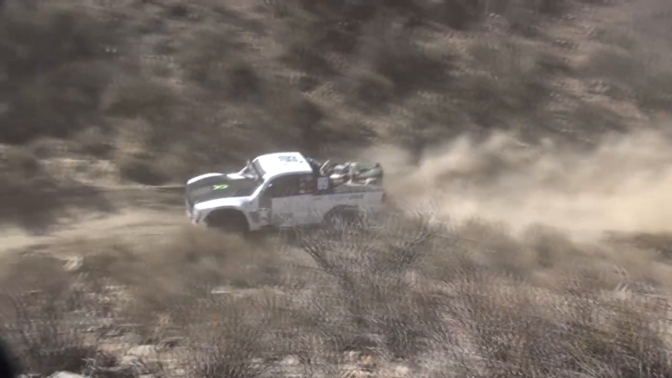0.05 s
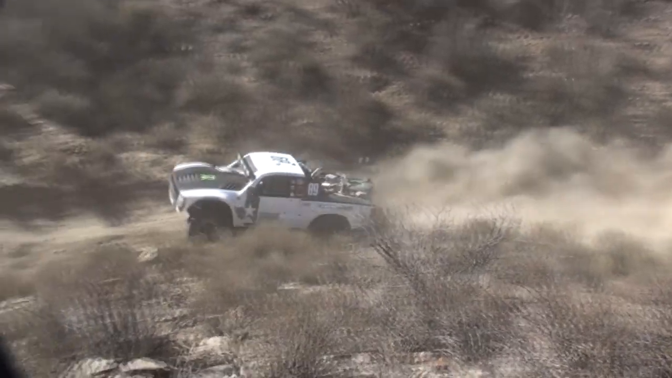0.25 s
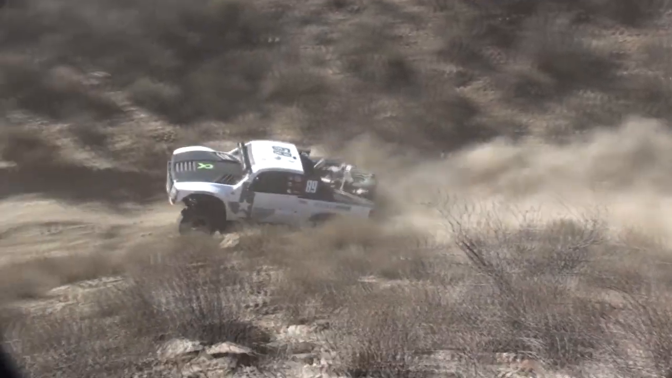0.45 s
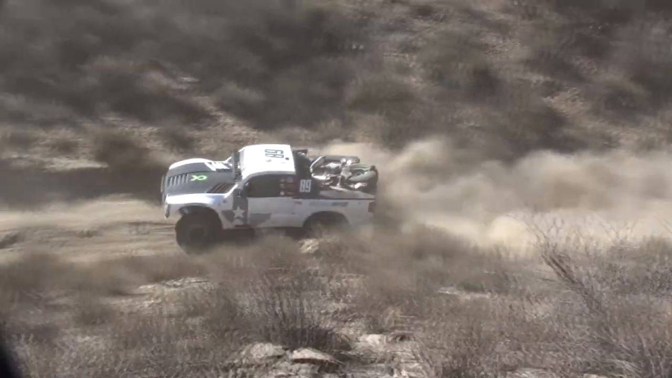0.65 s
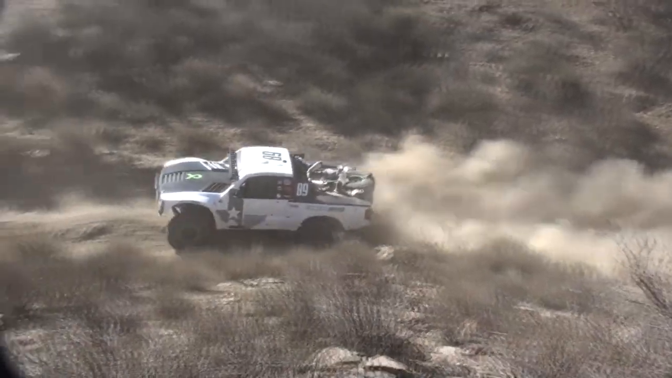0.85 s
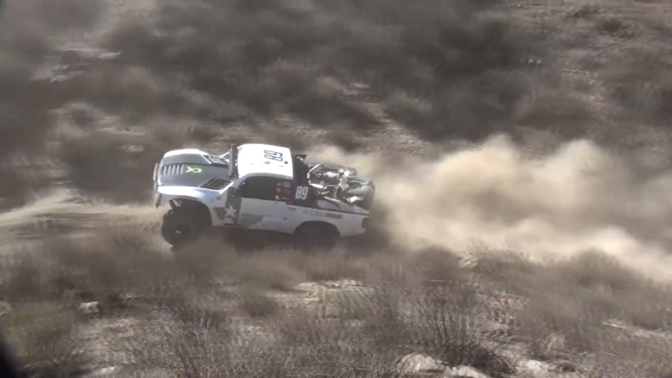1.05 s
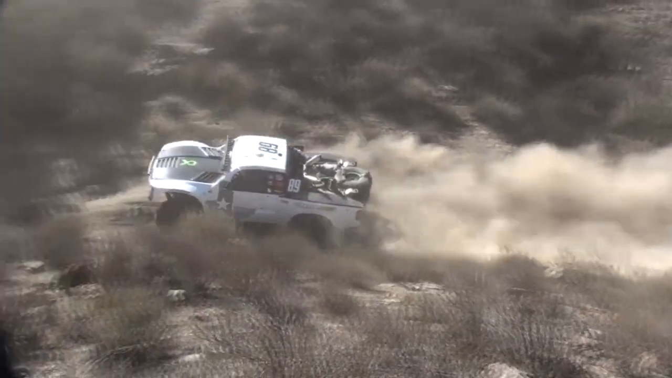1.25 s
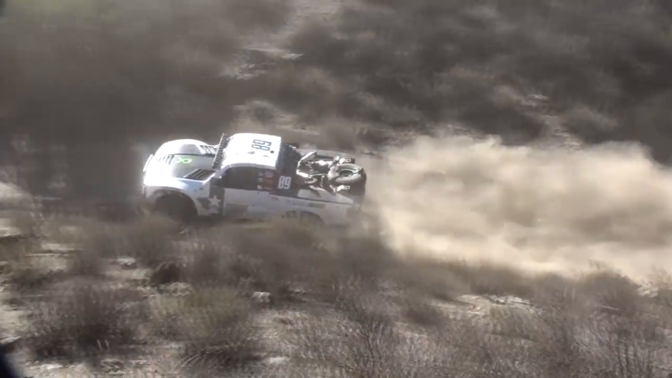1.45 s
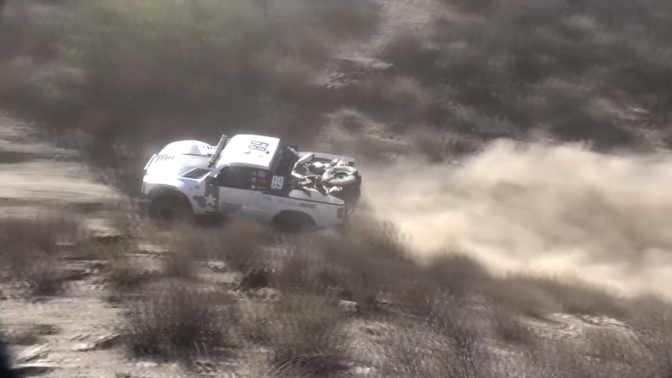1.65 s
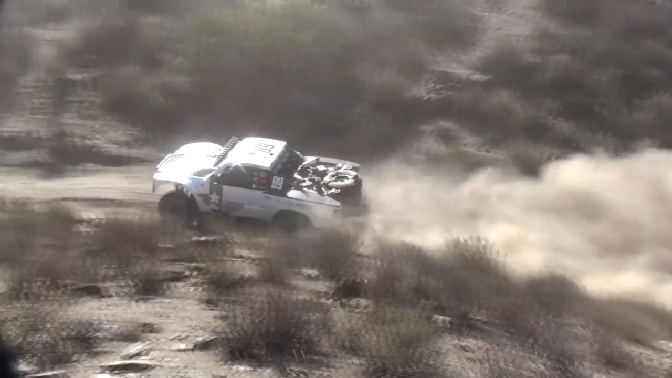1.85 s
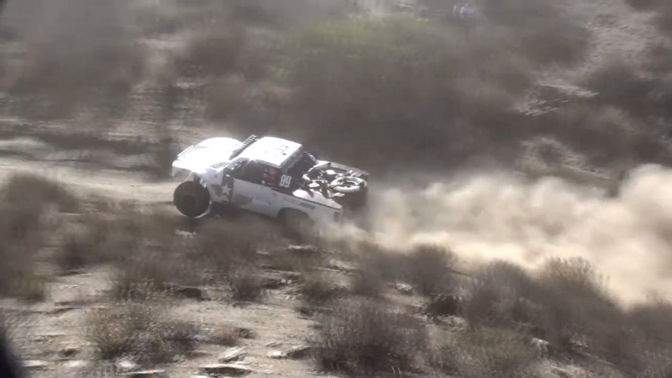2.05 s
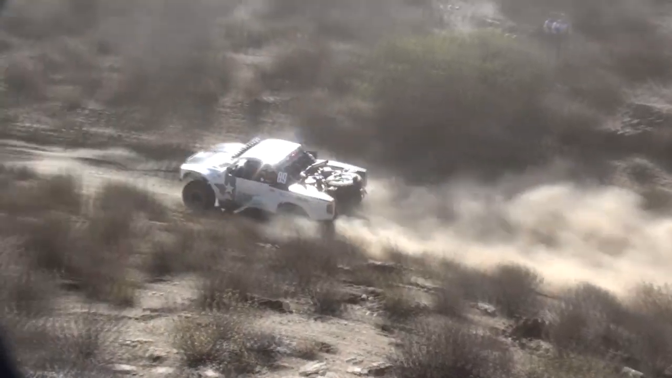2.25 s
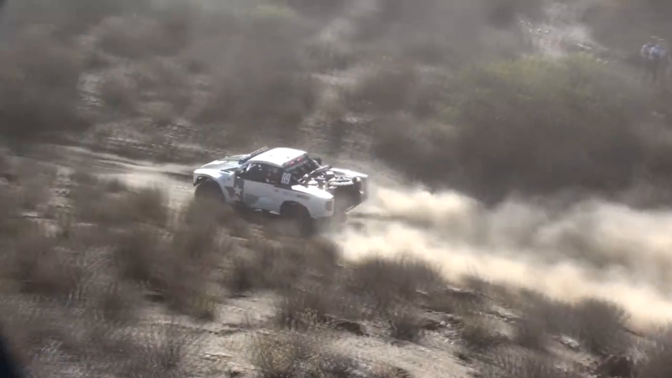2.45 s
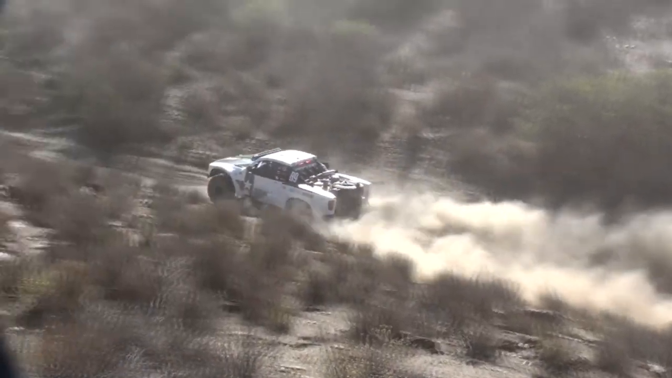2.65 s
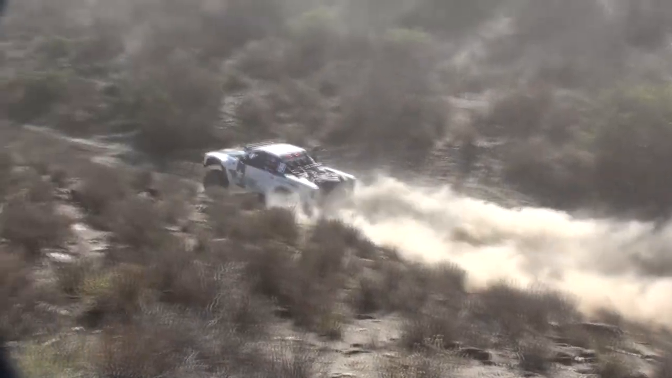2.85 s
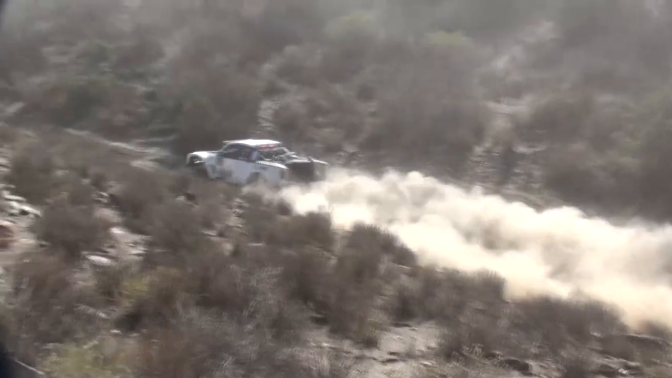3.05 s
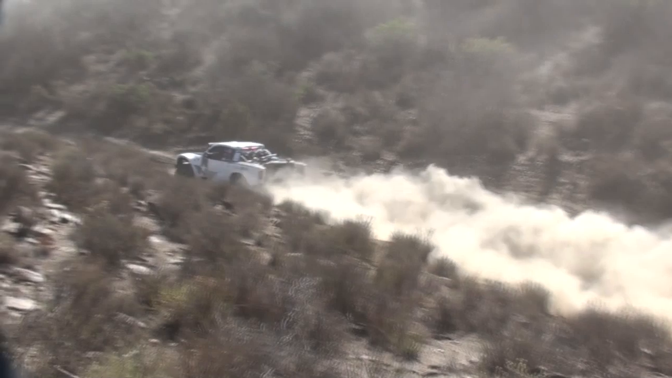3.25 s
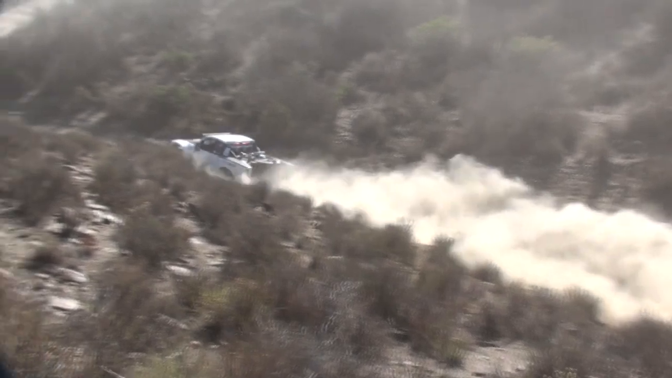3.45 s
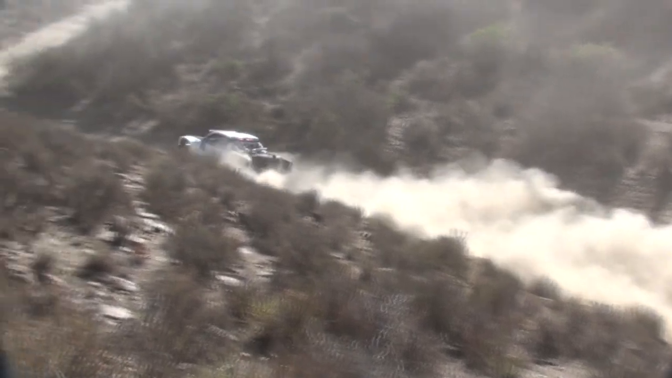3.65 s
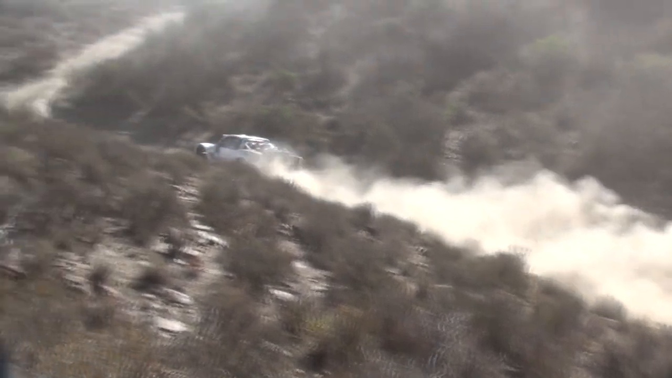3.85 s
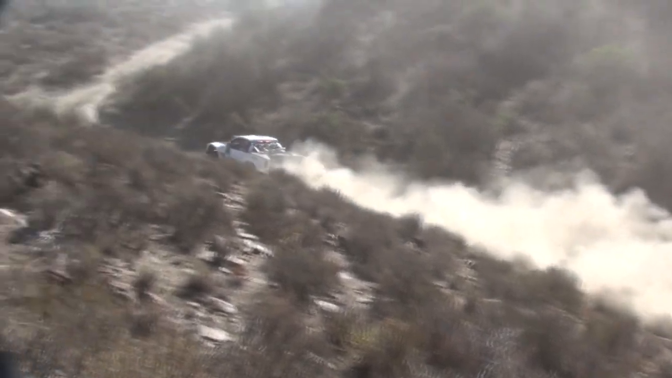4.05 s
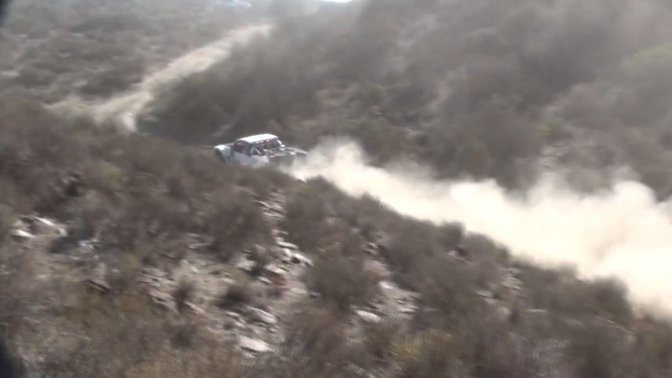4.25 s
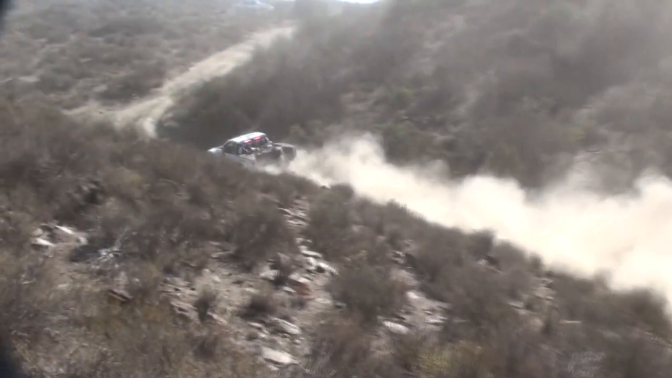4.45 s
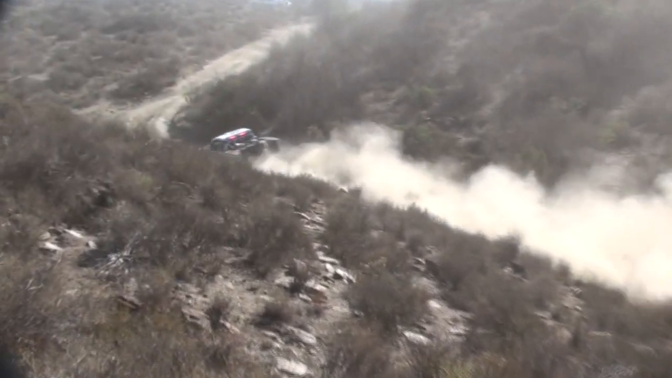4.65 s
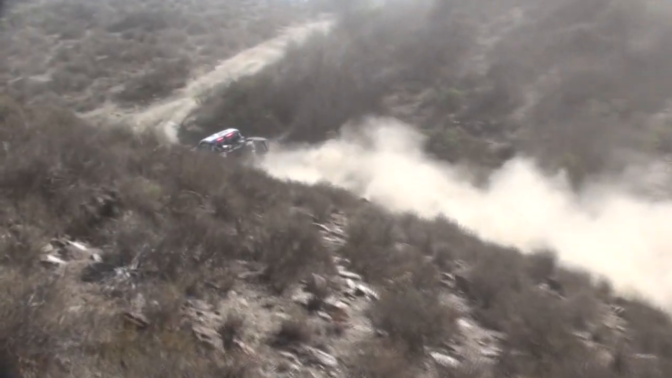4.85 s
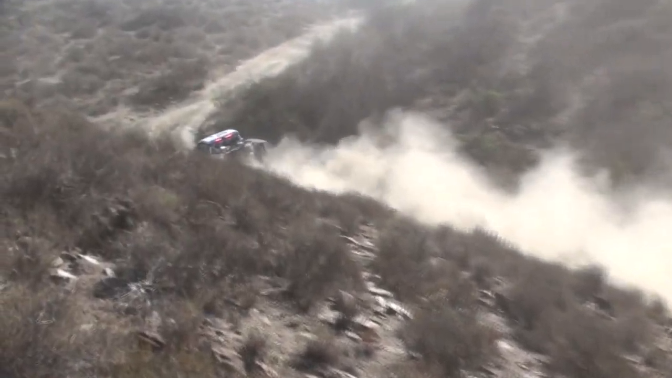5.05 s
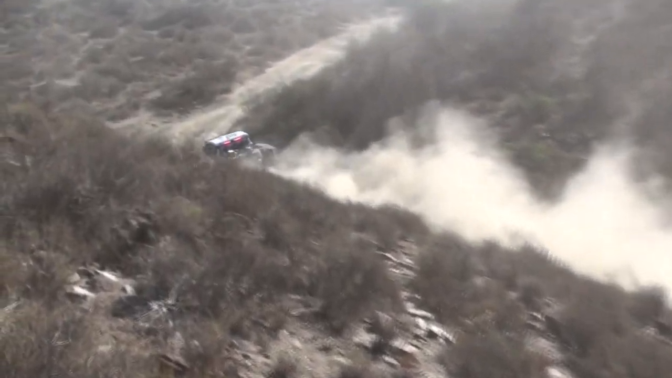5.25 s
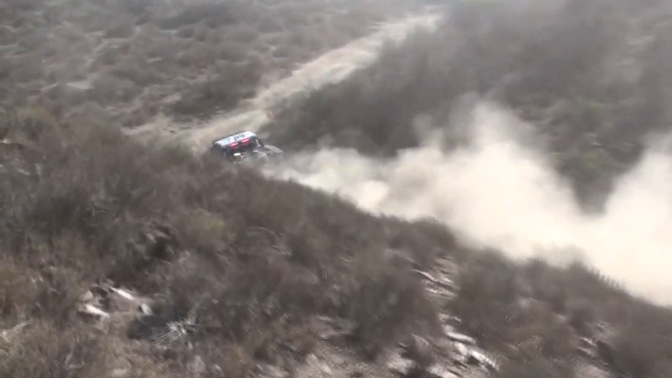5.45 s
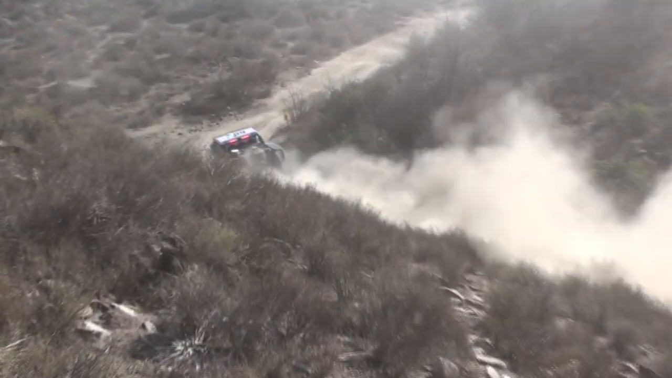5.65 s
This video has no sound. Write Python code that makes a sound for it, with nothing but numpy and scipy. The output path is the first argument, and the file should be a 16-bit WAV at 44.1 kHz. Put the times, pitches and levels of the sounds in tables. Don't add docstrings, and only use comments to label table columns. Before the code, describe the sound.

A racing truck's raw eight-cylinder exhaust rasps and crackles up a dusty hillside, then drops away to a faint coasting burble with brake squeal.

```python
import sys
import numpy as np
from scipy import signal
from scipy.fft import rfft, irfft, next_fast_len
from scipy.io import wavfile
from scipy.ndimage import uniform_filter1d, map_coordinates

SR = 44100
rng = np.random.default_rng(int(sys.argv[2]) if len(sys.argv) > 2 else 0)


def gain_from_db(level_db):
    decades = np.asarray(level_db, float) / 20
    return 10 ** decades


def materialize(psi):
    bounded = np.clip(np.atleast_2d(psi).T, -1, 1)
    quanta = np.round(bounded * 32767).astype(np.int16)
    wavfile.write(sys.argv[1], SR, quanta)


N = 251811

# (time [s], drop of the drone [dB], drop of the rasp [dB])
THROTTLE_LIFTS = [(.36, -2, 0.5), (.51, 2, -0.5), (2.41, 0, 7), (2.66, 3.5, 2), (3.2, 5, 1), (3.94, 7, 3),
                  (4.72, 14, 2), (4.88, 8.5, 2), (5.07, 5.5, 2.5), (5.4, 5.5, 0.5), (5.57, -3.5, -1.5),
                  (5.7, 3, -1.5)]
LIFT_S = 0.1


def engine():
    # (time [s], crank speed [turns/s])
    crank_speed = [(0, 43), (.27, 43.5), (.33, 48), (.47, 51.5), (.53, 40.5), (.63, 38.6), (.715, 40.9),
                   (1.055, 51.4), (1.565, 55.3), (1.9, 61.2), (2.32, 61), (2.42, 54.6), (2.8, 61.1),
                   (3.09, 59.8), (3.2, 56.7), (3.84, 56.2), (4.1, 41.5), (4.65, 39.5), (4.79, 39.3),
                   (4.86, 36.6), (5.06, 37), (5.14, 39), (5.38, 39.8), (5.45, 38), (5.52, 39.5),
                   (5.62, 48.3)]
    # (time [s], change of crank speed [turns/s])
    wheelspin = [(.12, -.9), (1.38, .6), (1.99, .7), (2.14, -1.9), (2.27, .7), (2.93, -.3), (3.44, -.6),
                 (3.72, 1.5), (4.2, -1), (4.38, 2.4), (4.96, 1)]
    # (time [s], driving stage [0-5], evenness of firing [0-1])
    driving = [(0, 0, .3), (.55, 0, .3), (.7, 0, .62), (1.1, 0, .84), (1.5, 0, .87), (1.75, 1, .88),
               (2, 1, .88), (2.15, 2, .88), (3.1, 2, .9), (3.25, 3, .93), (3.85, 3, .91), (4.05, 4, .6),
               (4.65, 4, .5), (4.75, 5, .4), (5.71, 5, .45)]
    turns = curves(crank_speed)[0] + bumps(wheelspin, width_s=.08)
    revolutions = np.cumsum(turns) / SR - .55
    crank = 2 * np.pi * revolutions
    stage, even = curves(driving)

    pulses, jet = firings(turns, revolutions, scatter_db=1.1, jitter=.009)
    roar = unit(0.63 * jet + 0.58 * rng.standard_normal(N))
    lope = unit(gain_from_db(even * (4.3 * np.cos(crank) + 2.5 * np.cos(crank / 2))))
    gas = lope * (even * pulses + np.sqrt(1 - even ** 2) * roar)
    rasp = gain_from_db(effort() - 2.5 + 0.63 * wobble(25.43)) * surging(heard_from_heading(gas))
    tones = drone(crank) + pipe_orders(crank, stage, even) + singing(crank)
    return tones + body_boom(roar) + rasp, even * lope * jet


def firings(turns, revolutions, scatter_db, jitter):
    # (strength of the blow [dB], lag [firing gaps])
    cylinders = [(6, -0.01), (9, 0.186), (10.5, -0.151), (0.5, 0.237), (7.5, 0.0019), (12.5, -0.206),
                 (4.5, 0.097), (-3.5, -0.079)]
    count = 4 * revolutions
    k = np.arange(1, int(count[-1]) - 1)
    blow_db, lag = np.transpose(cylinders)[:, k % len(cylinders)]
    luck = rng.standard_normal((N // 100, 2))[k]
    at = np.interp(k + lag + jitter * luck[:, 0], count, np.arange(N)).astype(int)
    pulses = np.bincount(at, gain_from_db(blow_db + scatter_db * luck[:, 1]), N)

    jet_decay = np.exp(-np.arange(SR // 50) / SR / 0.006)
    jet = signal.fftconvolve(pulses, jet_decay)[:N]

    delay_s = .007 * (1 + uniform_filter1d(rng.uniform(-3, 3, 2049), size=24))
    phase = 2 * np.pi * np.cumsum(np.abs(delay_s)) * SR / 4096
    pulses = signal.fftconvolve(pulses, irfft(np.exp(-1j * phase)))[:N]

    density = np.sqrt(turns)
    return unit((pulses - 4 * turns / SR) / density), unit(jet * rng.standard_normal(N) / density)


def drone(crank):
    # (time [s], drone level [dB], third order over firing order [dB])
    drone_levels = [(0, -25, 9), (.1, -15, -25), (.2, -16.5, 7), (.36, -21, 6), (.47, -19.5, 19),
                    (.55, -21, -4), (.7, -17.5, -8), (.8, -15, 10.5), (1.05, -11, -18.5), (1.9, -11, -28),
                    (2.3, -12, -15.5), (2.52, -14, 1), (2.9, -16, -7.5), (3.2, -19.5, -2.5), (3.75, -20, 7),
                    (4.1, -24, 22), (4.55, -24.5, 6), (4.78, -18.5, 10.5), (5.5, -23.5, 4.5),
                    (5.585, -20, 26), (5.62, -26, 5)]
    drone_db, apart_db = curves(drone_levels)
    firing_db = drone_db - bumps(THROTTLE_LIFTS, LIFT_S) - 10 * np.log10(1 + gain_from_db(2 * apart_db))
    third_db = firing_db + apart_db
    third = gain_from_db(third_db + 3 + 1.2 * wobble(18)) * np.sin(3 * crank + .2 * wobble(25))
    firing = gain_from_db(firing_db + 3 + .6 * wobble(18)) * np.sin(4 * crank + .1 * wobble(25))
    return third + firing


def pipe_orders(crank, stage, even):
    # (multiple of the crank, then level over the rasp [dB] while: pulling away [dB], winding up [dB],
    # climbing [dB], cresting [dB], lifting off [dB], coasting [dB])
    orders = [(1.5, -20.5, -15, -16.5, -15, -12, -12), (2, -40, -14.5, -15.5, -13.5, -17, -7),
              (2.5, -31, -17.5, -14.5, -20, -12.5, -3), (3.5, -22.5, -19, -21, -12.5, -2.5, 7.5),
              (4.5, -10.5, -15, -15.5, -18, -9, -7), (5, -6.5, -18, -18, -42, -31, -7),
              (5.5, -15.5, -19.5, -24, -15, -14, -7), (6, -14, -16, -16.5, -49, -12.5, -4.5),
              (6.5, -14.5, -18, -20, -44, -23, -20), (7, -10, -22.5, -11.5, -13, -43, -7),
              (7.5, -44, -31, -39, -25, -20, -13), (8, -14, -18.5, -19, -16.5, -12, -9)]
    rasp_db = effort()
    tone = np.zeros(N)
    for multiple, *over_db in orders:
        level_db = rasp_db + np.interp(stage, range(len(over_db)), over_db) + 3.17 * wobble(8)
        level_db += (multiple > 6) * 40 * np.log10(np.minimum(2 * even, 1))
        blur = (1.15 - even) * 1.9 * wobble(16)
        tone += gain_from_db(level_db + 2.5) * np.sin(multiple * crank + blur + rng.uniform(0, 7))
    return tone


def singing(crank):
    # (time [s], multiple of the crank, peak level [dB], length [s])
    crossings = [(0.202, 8, -30.5, 0.069), (0.777, 8, -24, 0.12), (0.952, 7, -33, 0.075),
                 (0.948, 12, -25, 0.052), (1.32, 7, -31.5, 0.19), (2, 9.5, -31.5, 0.13),
                 (2.017, 20, -32, 0.088), (2.302, 17, -19, 0.024), (2.472, 7, -31, 0.089),
                 (2.475, 10.5, -30, 0.18), (2.835, 8, -31, 0.043), (2.903, 7, -50, 0.11),
                 (3.017, 17.5, -41, 0.066), (3.46, 7, -35, 0.08), (3.49, 10.5, -35.5, 0.081),
                 (3.724, 7, -35.5, 0.11), (3.715, 14, -28, 0.076), (3.96, 8, -31, 0.026),
                 (5.67, 7, -46, 0.034)]
    song = np.zeros(N)
    for s, multiple, db, length in crossings:
        near = slice(max(round((s - .4) * SR), 0), round((s + .4) * SR))
        bell = np.exp(-((np.arange(N)[near] / SR - s) / max(length, .02)) ** 2)
        song[near] += gain_from_db(db + 3.5) * bell * np.sin(np.round(2 * multiple) / 2 * crank[near])
    return song


def effort():
    # (time [s], exhaust rasp level [dB])
    rasp_levels = [(0, -11.5), (.1, -22), (.2, -17), (.4, -23), (.51, -18.5), (.8, -18.5), (1.1, -22.5),
                   (1.75, -20), (2.05, -17.5), (2.95, -18), (3.25, -27), (3.5, -21), (3.76, -20.5),
                   (3.92, -25), (4.03, -32.5), (4.55, -32.5), (4.85, -36.5), (5.15, -43), (5.52, -43),
                   (5.59, -41.5)]
    return curves(rasp_levels)[0] - bumps(THROTTLE_LIFTS, LIFT_S, column=2)


def heard_from_heading(gas):
    # (time [s], heading [0-5, in the order of the colours below])
    turning = [(0, 0), (1.3, 0), (1.7, 1), (2.33, 1), (2.45, 2), (3.25, 2), (3.45, 3), (3.9, 3), (4.1, 4),
               (5.5, 4), (5.56, 5)]
    # (frequency [Hz], spectral level [dB per Hz])
    side_on = [(250, -32.5), (420, -5), (583, -1.5), (791, -7), (972, 0.5), (1170, -5.5), (1290, -5),
               (1390, -15), (1530, -6.5), (2300, -23), (2990, -40), (5060, -120)]
    quarter = [(260, -48), (440, 0.5), (572, -1), (777, -7), (947, 4.5), (1130, 0), (1240, 8), (1360, -5.5),
               (1500, 4), (1700, -6), (1850, -2.5), (2230, -13), (2750, -21), (3250, -8), (3800, -19),
               (4940, -99), (8360, -120)]
    behind = [(260, -43.5), (440, -10), (455, 3), (481, -2.5), (744, -1.5), (867, -7.5), (1020, 6),
              (1130, -3), (1560, -8.5), (1950, -10.5), (2300, -19), (2990, -21.5), (5060, -120)]
    crest = [(260, -15.5), (440, 1), (719, -4), (792, -1.5), (929, 7.5), (1070, -5), (1230, 4.5),
             (1490, -5), (1680, 1), (1960, -13), (2300, -21), (2990, -19), (5060, -120)]
    hidden = [(190, -22), (330, -4.5), (512, 1.5), (738, -6.5), (1000, -6.5), (1260, -10), (2300, -20.5),
              (2990, -102), (5060, -120)]
    gully = [(180, -30), (300, -23), (338, -17), (401, -19), (614, -18.5), (893, -19.5), (2300, -40),
             (2990, -74), (5060, -120)]
    heading = curves(turning)[0]
    rasp = np.zeros(N)
    for k, colour in enumerate((side_on, quarter, behind, crest, hidden, gully)):
        share = np.clip(1 - abs(heading - k), 0, 1)
        rasp += np.sqrt(share) * coloured(gas, colour)
    return rasp


def surging(x):
    # (time [s], centre [Hz], gain [dB], length [s])
    surges = [(0.38, 990, -4.5, 0.12), (0.8, 605, 5, 0.19), (1.07, 1320, 6.5, 0.26), (1.53, 800, 4.5, 0.11),
              (1.3, 1500, 5, 0.066), (2.04, 1200, 4, 0.038), (2.2, 1960, 5.5, 0.08), (1.8, 1700, 9, 0.021),
              (2.496, 1960, 8.5, 0.076), (2.53, 840, -1, .05), (2.9, 2200, 1, 0.09),
              (2.8, 1050, -2.5, 0.15), (2.822, 530, 8, 0.046), (3.11, 1320, 7, 0.14),
              (3.3, 2200, 12, 0.061), (3.121, 800, 6.5, 0.15), (3.466, 1191, 2, 0.062),
              (3.721, 2750, 12, .051), (4.9, 901, 0, .051), (5.578, 910, 9, .046), (3.6, 1700, 0, 0.025),
              (2, 1190, -4, .03), (1.2, 1760, 6.5, 0.18), (0.19, 587, 8.5, 0.075), (2.6, 2750, 10, 0.18),
              (2, 540, -5, 0.13), (1.13, 525, 9, .1), (0.62, 1000, 3.5, 0.049), (1.6, 1950, 6.5, 0.029),
              (5.64, 1240, 10, 0.071)]
    hz, t, z = signal.stft(x, SR, nperseg=1024)
    s, centre, db, length = np.transpose(surges)[..., None]
    octaves_off = np.log2((hz + 1) / centre)
    band = np.exp(-(octaves_off / 0.24) ** 2)
    gain_db = (db * band).T @ np.exp(-((t - s) / np.maximum(length, .02)) ** 2)
    return signal.istft(z * gain_from_db(gain_db), SR, nperseg=1024)[1][:N]


def body_boom(roar):
    # (time [s], peak level [dB], hold [s])
    landings = [
        (0, -30.5, 0.14),
        (.68, -29, 0.041),
        (2.42, -49, .04),
        (2.86, -35, 0.16),
        (3.61, -38, 0.28),
        (5.2, -43, 0.58),
    ]
    # (frequency [Hz], spectral level [dB])
    drumming = [(20, -46), (45, -16), (120, -1), (220, 7), (300, -6), (420, -9), (560, -66.5),
                (9000, -37.5), (14500, -72)]
    level_db = swells(landings, rise_db_s=16, fall_db_s=16.5, rest_db=-55)
    return gain_from_db(level_db + 8.5) * coloured(roar, drumming)


def crackles():
    # (time [s], peak level [dB], pitch [Hz])
    fuel_pops = [(0.7515, -21, 3045), (0.8608, -24, 2490), (0.9645, -29, 2460), (1.0434, -19, 2470),
                 (1.1022, -18, 3050), (1.2165, -36, 3030), (1.2349, -32, 2840), (1.2549, -19, 3150),
                 (1.2928, -13, 3330), (1.3292, -14, 3300), (1.3656, -23, 3080), (1.5118, -21, 3280),
                 (1.5477, -39, 3100), (1.5856, -14, 3120), (1.634, -13.5, 3000), (1.6555, -14, 3360),
                 (1.6684, -15, 3500), (1.7034, -11, 3330), (1.7238, -28, 3100), (1.7548, -32, 3200),
                 (1.7702, -12, 3460), (1.8041, -18, 3030), (1.871, -11.5, 3200), (1.9044, -13.5, 3120),
                 (1.9688, -11.5, 3740), (2.0336, -14, 3110), (2.066, -38, 3170), (2.1, -35, 3240),
                 (2.1543, -19, 3140), (2.1868, -12, 3500), (2.1997, -7, 2600), (2.2197, -14, 3100),
                 (2.2656, -12, 3300), (2.318, -24, 2420), (2.4951, -21, 2630), (2.5345, -10, 3000),
                 (2.5684, -13, 2640), (2.6033, -14.5, 2570), (2.6392, -17.5, 2720), (2.7425, -20, 3080),
                 (2.7869, -16.5, 2950), (2.9171, -18, 2460), (2.9391, -24, 2500), (2.9515, -21, 2410),
                 (2.9725, -25, 2400), (2.985, -16, 2490), (3.6474, -18, 3270), (3.6829, -22, 2750),
                 (3.7013, -15, 3020)]
    # (time [s], peak level [dB], pitch [Hz])
    barks = [(0.39, -17, 930), (0.518, -11, 1040), (0.569, -13, 1030), (0.738, -5.5, 931), (0.798, -3, 558),
             (0.863, -6, 560), (0.8645, -6, 940), (0.905, -5, 553), (0.949, -7.5, 600), (1.121, -10, 985),
             (1.194, -6, 503), (1.234, -13, 623), (1.907, -16, 1260), (1.972, -12, 1255),
             (2.004, -16, 1200), (2.263, -14, 1020), (2.351, -17, 1020), (2.971, -36, 1040),
             (3.003, -11, 1024), (3.036, -12, 1040), (3.069, -12, 1080), (3.103, -11, 790),
             (3.187, -13, 640), (3.222, -13, 634), (3.257, -12.5, 666), (3.327, -16, 690),
             (3.433, -11, 910), (3.67, -26, 790), (3.714, -10, 816), (3.752, -16, 930), (3.786, -17, 930)]
    # (frequency [Hz], spectral level [dB])
    tailpipe = [(900, -37), (2200, -9.5), (3200, -1), (4200, -10.5), (7000, -17.5), (11000, -104)]
    ring, flash = pops(fuel_pops, gain_db=-1.5, ring_s=0.013, noise_db=0)
    burst = flash * coloured(rng.standard_normal(N), tailpipe)
    bark = pops(barks, gain_db=-2.5, ring_s=0.048, noise_db=0)[0]
    return ring + burst + bark


def pops(events, gain_db, ring_s, noise_db):
    t = np.arange(SR // 30) / SR
    ring, flash = np.zeros((2, N + len(t)))
    for s, db, hz in events:
        shape = gain_from_db(db + gain_db - 60 * t / ring_s) * (1 - np.exp(-t / .0012))
        ring[round(s * SR):][:len(t)] += shape * np.sin(2 * np.pi * hz * t)
        flash[round(s * SR):][:len(t)] += gain_from_db(noise_db) * shape
    return ring[:N], flash[:N]


def chassis(jet):
    # (time [s], peak level [dB], hold [s])
    sprays = [(.04, -27, 0.0096), (.29, -27.5, 0.0066), (.72, -29.5, 0.027), (1.13, -34.5, 0.0089),
              (2.07, -32.5, 0.0058), (2.26, -32, 0.0044), (2.53, -34.5, 0.015), (1.78, -34, 0.094),
              (3.27, -40.5, 0.196), (3.7, -38.5, 0.029), (4.26, -48, 0.02), (4.66, -45, .01),
              (4.85, -50, 0.0073), (4.94, -52.5, .01)]
    # (frequency [Hz], spectral level [dB per Hz])
    gravel = [(1240, -14.5), (2100, -2.5), (3140, 1.5), (3970, -7), (4470, -5), (6330, -12.5), (7830, -8),
              (8950, -20.5), (10600, -16.5), (12500, -25.5), (14300, -32), (14900, -73)]
    # (time [s], peak level [dB], length [s])
    rattles = [(0.01, -25.5, 0.027), (0.123, -19, 0.0089), (0.183, -26.5, 0.031), (0.254, -13.5, 0.011),
               (0.339, -28.5, 0.042), (0.516, -31, 0.14), (0.657, -36, 0.057), (0.728, -29, 0.03),
               (0.75, -26, 0.013), (0.79, -29.5, 0.05), (0.857, -25, 0.017), (0.927, -45, 0.024),
               (1.045, -25, 0.012), (1.115, -33, 0.02), (2.2, -30, 0.011), (2.66, -28, 0.017),
               (3.706, -47, 0.017), (4.252, -31.5, 0.011), (4.372, -37, 0.014), (4.498, -41, 0.029),
               (4.55, -43, 0.033), (4.649, -36.5, 0.018), (4.735, -43, 0.053), (4.842, -36.5, 0.014),
               (4.932, -44, 0.024), (5.054, -37, 0.021), (5.182, -52.5, 0.059), (5.28, -50, 0.042),
               (5.517, -48, 0.02), (5.62, -48, 0.032)]
    # (frequency [Hz], spectral level [dB])
    panels = [(1000, -58), (2000, 3.5), (3100, 1.5), (4000, -2.5), (6200, -9.5), (7800, -2.5), (9000, -11),
              (10600, -6), (12500, -16), (14300, -55)]
    slow_effort = uniform_filter1d(effort(), size=SR // 3)
    rolling_db = -32.5 + 0.68 * (slow_effort + 20) - 2 * np.arange(N) / SR
    spray = unit(gain_from_db(1.8 * wobble(300) + .8 * wobble(14)) * rng.standard_normal(N))
    hiss_db = swells(sprays, rise_db_s=45, fall_db_s=150, rest_db=rolling_db)
    hiss = gain_from_db(hiss_db + 1.5) * coloured(.55 * spray + 1.05 * jet, gravel)

    t = np.arange(SR // 5) / SR
    shake = np.zeros(N + len(t))
    for s, db, length in rattles:
        decay = np.exp(-t / max(length, .004))
        shake[round((s - .004) * SR):][:len(t)] += gain_from_db(db) * (1 - np.exp(-t / 0.0092)) * decay
    ring = coloured(gain_from_db(0.62 * wobble(430)) * rng.standard_normal(N), panels)
    return hiss + gain_from_db(-0.5) * shake[:N] * ring


def brakes():
    # (time [s], peak level [dB], hold [s])
    drags = [
        (4.578, -43.5, 0.018),
        (4.66, -43, 0.23),
        (4.99, -55.5, 0.36),
        (5.31, -52, 0.043),
        (5.42, -70, .08),
        (5.58, -60, .12),
    ]
    # (time [s], offset from the squeal pitch [Hz])
    sag = [(4.55, -70), (4.63, 60), (4.92, -50), (4.97, 60), (5.25, 0), (5.32, -110), (5.5, -120),
           (5.58, 40)]
    # (time [s], peak level [dB], hold [s])
    gear_loads = [
        (4.32, -51, .01),
        (4.456, -44.5, 0.025),
        (4.53, -65, 0.1),
        (4.68, -54, 0.15),
        (4.91, -54.5, 0.13),
    ]
    db = swells(drags, rise_db_s=504, fall_db_s=139, rest_db=-90)
    squeal_hz = 6020 + curves(sag)[0] + 40 * wobble(90)
    phase = 2 * np.pi * np.cumsum(squeal_hz) / SR
    halo_pole = np.exp(-2 * np.pi * 130 / SR)
    chatter = signal.lfilter([1], [1, -halo_pole], rng.standard_normal((2, N)))
    chatter = uniform_filter1d(chatter, size=40)
    squeal = (np.clip(db + 60, 1, 8) + chatter[0]) * np.sin(phase) + chatter[1] * np.cos(phase)
    squeal += np.clip(db + 48, 0, 5) / 20 * np.sin(2 * phase)

    whine_db = swells(gear_loads, rise_db_s=300, fall_db_s=248, rest_db=-90)
    whine_phase = 2 * np.pi * np.cumsum(3880 + 12 * wobble(60)) / SR
    whine = gain_from_db(whine_db - 0.5 + 1.3 * wobble(37)) * np.sin(whine_phase)
    return gain_from_db(db - 3.0) * unit(squeal) + whine


def hillside(x):
    # (frequency [Hz], level [dB])
    slope = [(100, -29), (400, -15.5), (1200, -25), (2500, -13.5), (7000, -9), (12000, -10)]
    t = np.arange(SR // 4) / SR
    tail = [[1], [-1]] * rng.standard_normal(len(t)) * gain_from_db(-60 * t / 0.45)
    wet = signal.fftconvolve(x[None], tail / np.linalg.norm(tail[0]), axes=1)[:, :N]
    return filtered(wet, lambda hz: gain_from_db(along(slope, hz)))


def wind():
    # (time [s], peak level [dB], hold [s])
    gusts = [
        (0, -24, .1),
        (.3, -22, 0.1),
        (.9, -32, .3),
        (3.5, -52, 0.11),
        (4.04, -34, .68),
        (5.22, -30, 0.38),
    ]
    # (frequency [Hz], spectral level [dB per Hz])
    buffeting = [(8.8, -60), (15, -37), (43, -11), (80, -11), (90, -15), (120, -13), (200, -120)]
    ports = [coloured(gain_from_db(2.2 * wobble(3.8)) * rng.standard_normal(N), buffeting) for _ in "LR"]
    level_db = swells(gusts, rise_db_s=60, fall_db_s=45, rest_db=-38.5)
    return gain_from_db(level_db - 6.0) * np.array(ports)


def unit(x):
    return x / np.sqrt(np.mean(x ** 2) + 1e-20)


def along(points, hz):
    f, v = np.transpose(points)
    return np.interp(np.log(hz + 1), np.log(f + 1), v)


def curves(rows):
    s, *cols = np.transpose(rows)
    return [np.interp(np.arange(N) / SR, s, c) for c in cols]


def bumps(events, width_s, column=1):
    rows = np.transpose(events)
    t = np.arange(0, N + 64, 64) / SR
    bells = np.exp(-((t - rows[0][:, None]) / width_s) ** 2)
    return np.interp(np.arange(N) / SR, t, rows[column] @ bells)


def swells(events, rise_db_s, fall_db_s, rest_db):
    s, db, hold = np.transpose(events)[..., None]
    t = np.arange(0, N + 64, 64) / SR
    shape = db - rise_db_s * np.clip(s - t, 0, None) - fall_db_s * np.clip(t - s - abs(hold), 0, None)
    return np.maximum(np.interp(np.arange(N) / SR, t, shape.max(axis=0)), rest_db)


def wobble(rate):
    knots = rng.standard_normal(N // 100 + 8)
    coarse = map_coordinates(knots, [np.arange(N // 16 + 2) * 16 * min(rate, 400) / SR])
    return np.interp(np.arange(N) / 16, np.arange(len(coarse)), coarse)


def filtered(x, response):
    x = np.concatenate([x, x[..., :-2049:-1] * np.linspace(1, 0, 2048)], axis=-1)
    m = next_fast_len(N + SR // 2)
    return irfft(rfft(x, m) * response(np.fft.rfftfreq(m, 1 / SR)), m)[..., :N]


def coloured(x, spectrum):
    cepstrum = irfft(np.log(gain_from_db(along(spectrum, np.fft.rfftfreq(4096, 1 / SR))) + 1e-6))
    cepstrum[1:2048] *= 2
    cepstrum[2049:] = 0
    return unit(signal.fftconvolve(x, irfft(np.exp(rfft(cepstrum))))[:N])


def scene():
    # (frequency [Hz], left minus right [dB])
    lean = [(60, -11.5), (120, -8), (210, -5.5), (370, -3), (680, -7), (1200, -2), (2400, -3.5), (4200, -3),
            (7800, -6), (10000, 5), (14000, -10)]
    # (frequency [Hz], lead of the left port [rad])
    lead = [(0, -0.67), (250, 0.89), (1400, 0.46), (2600, 0.52), (3600, 0.37), (4100, -1), (5000, 0.066),
            (6400, -0.19), (7100, 0.84), (8800, 0.87), (10300, -0.25), (14400, 1)]
    # (time [s], left minus right [dB])
    drift = [(0, 0), (1, -0.9), (2.9, 0), (4.3, -0.1), (5.7, -1)]
    exhaust, jet = engine()
    truck = exhaust + chassis(jet) + brakes() + crackles()

    def ports(hz):
        half = gain_from_db(along(lean, hz) / 2) * np.exp(.5j * along(lead, hz))
        return np.array([half, 1 / half])

    panned = truck * gain_from_db([[.5], [-.5]] * curves(drift)[0])
    return filtered(panned, ports) + hillside(truck) + wind()


def top_cut(x):
    return signal.sosfilt(signal.butter(12, 14880, fs=SR, output="sos"), x)


def record(dry):
    clipped = dry / (1 + np.abs(dry) ** 8) ** (1 / 8)
    mix = clipped * np.clip(np.arange(N)[::-1] / 200, 0, 1)
    return top_cut(mix)


dry = scene()
out = record(dry)
materialize(out)
```